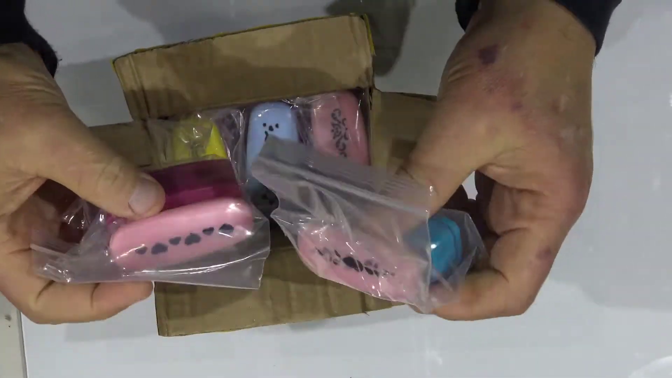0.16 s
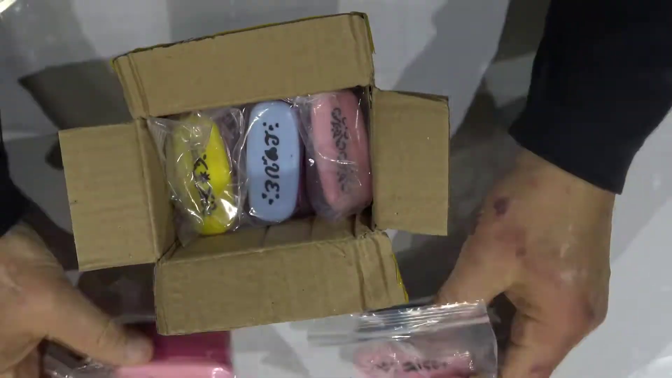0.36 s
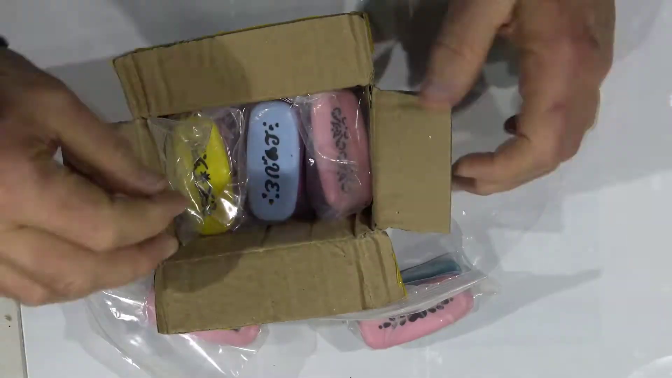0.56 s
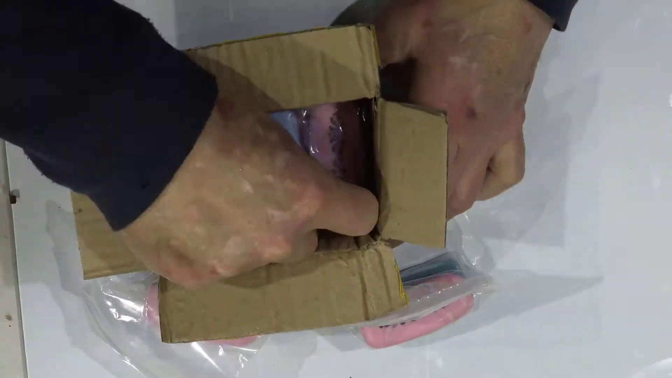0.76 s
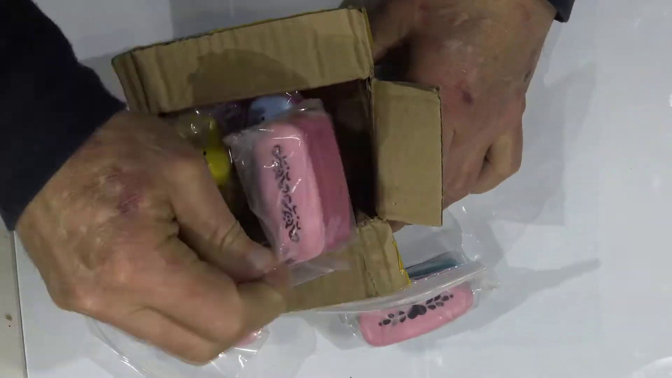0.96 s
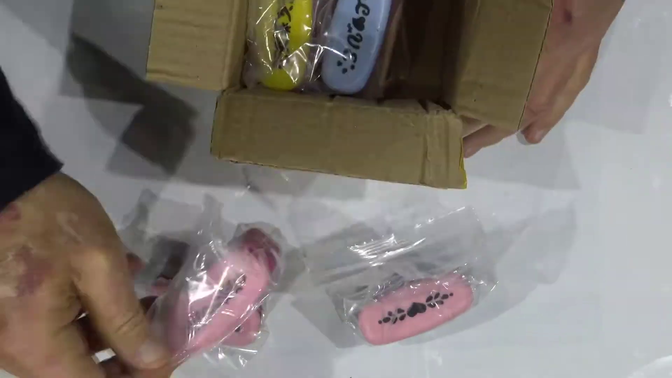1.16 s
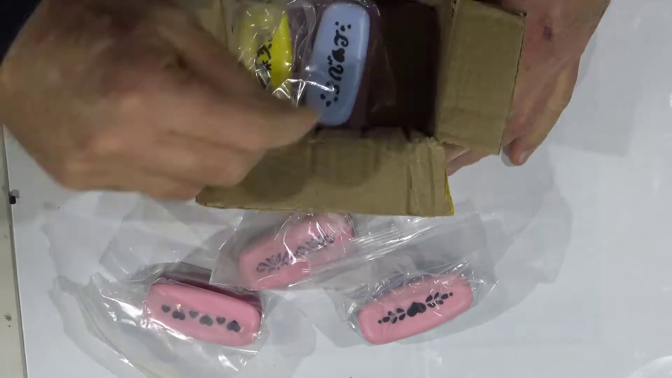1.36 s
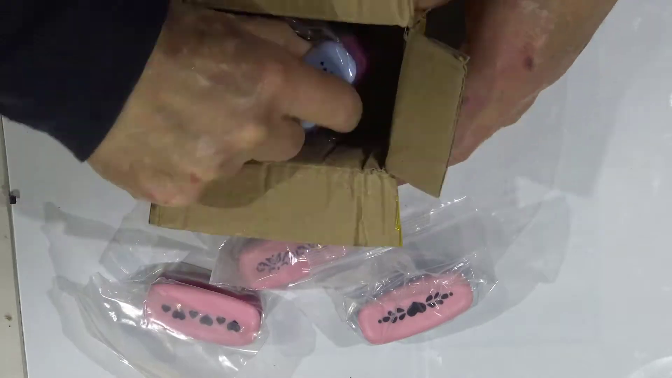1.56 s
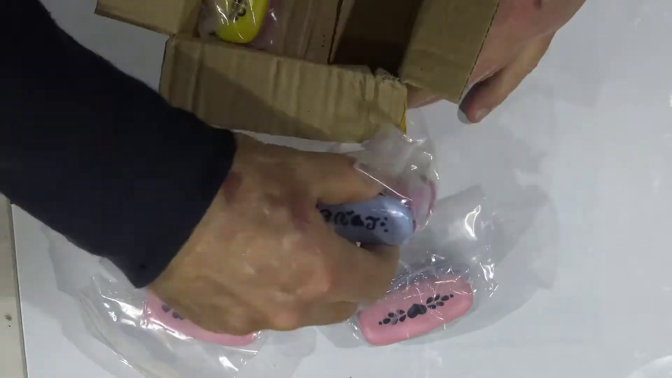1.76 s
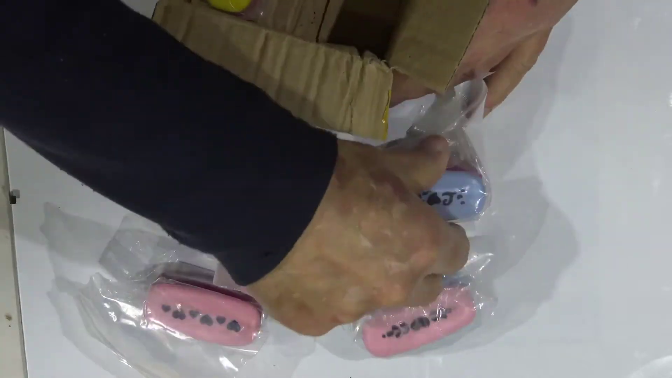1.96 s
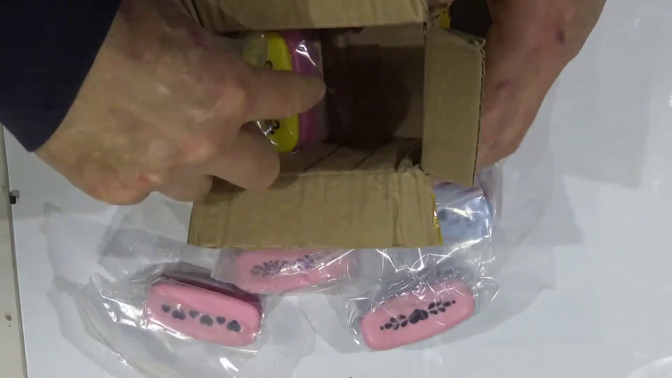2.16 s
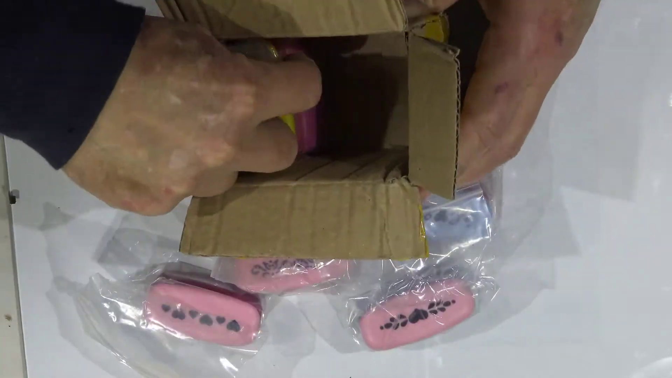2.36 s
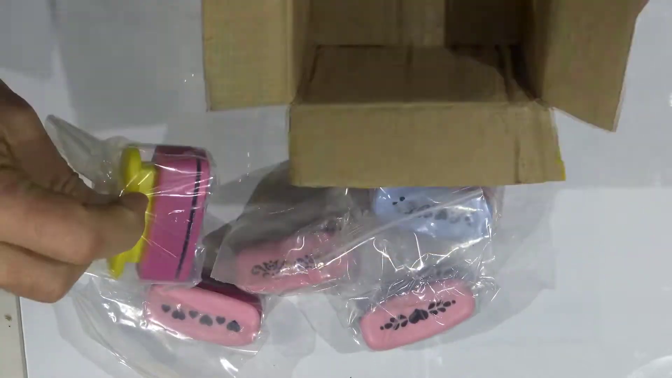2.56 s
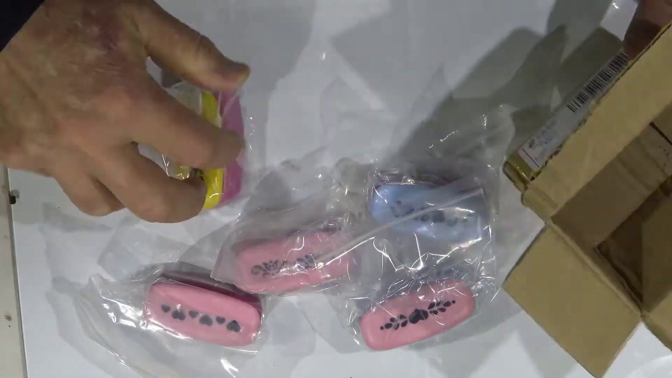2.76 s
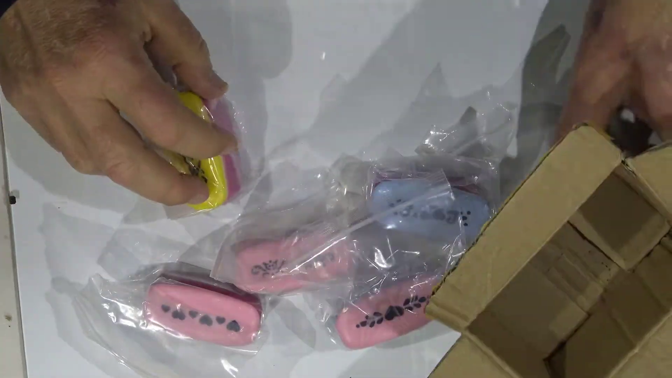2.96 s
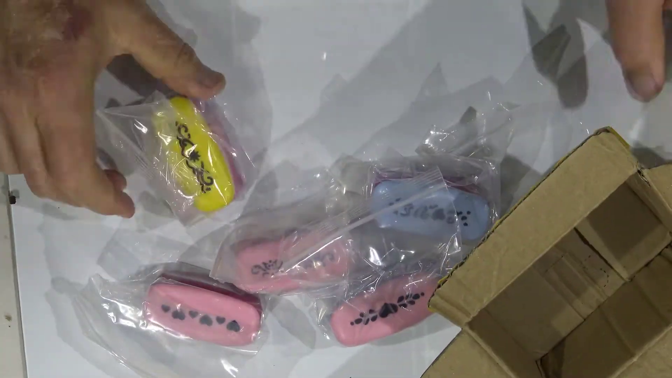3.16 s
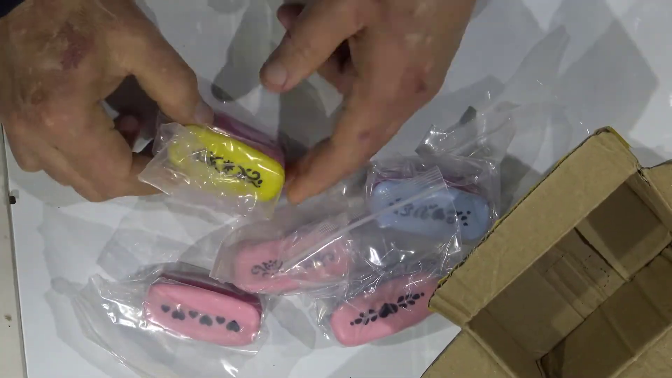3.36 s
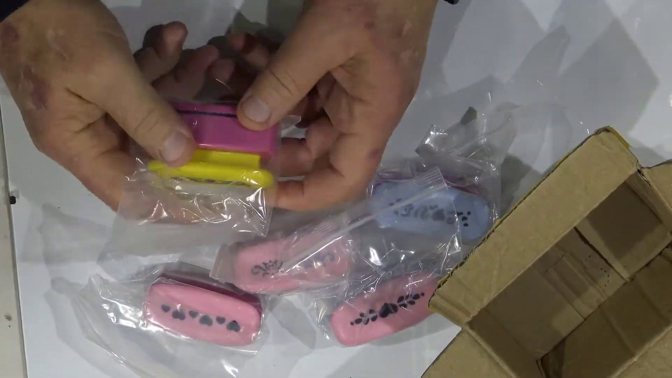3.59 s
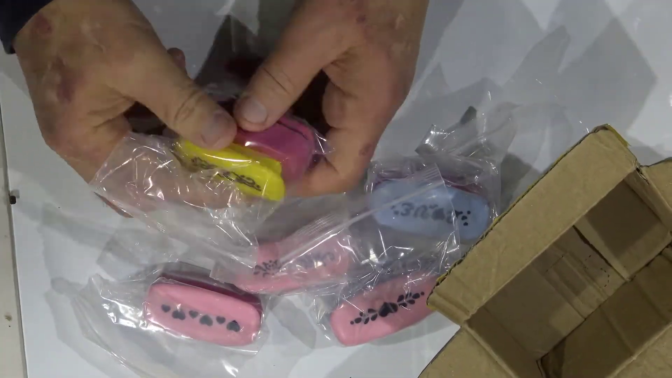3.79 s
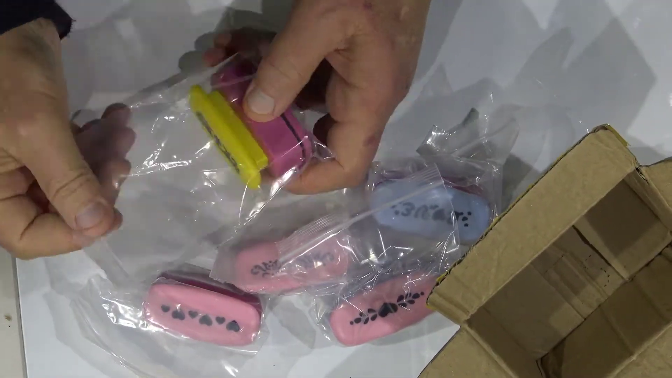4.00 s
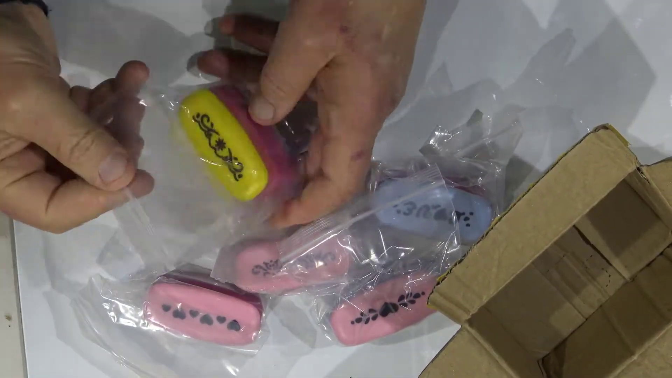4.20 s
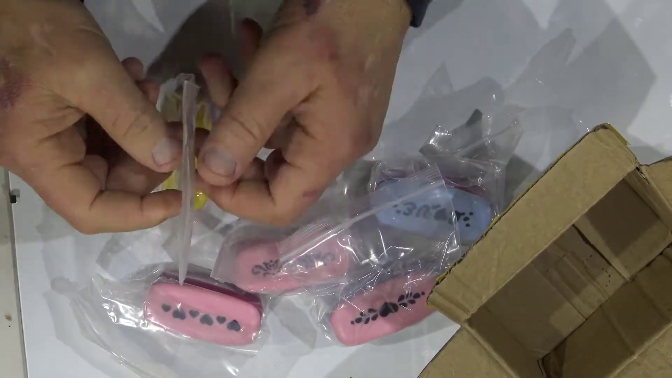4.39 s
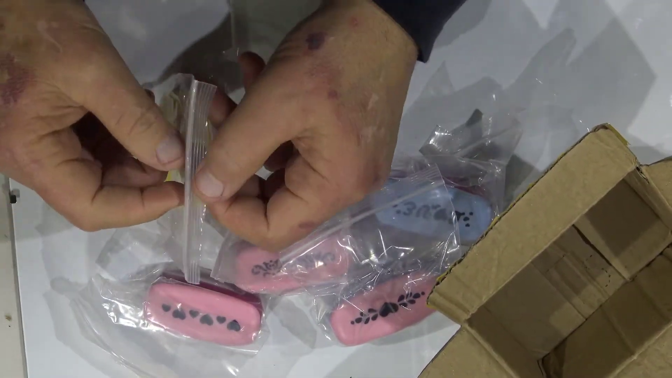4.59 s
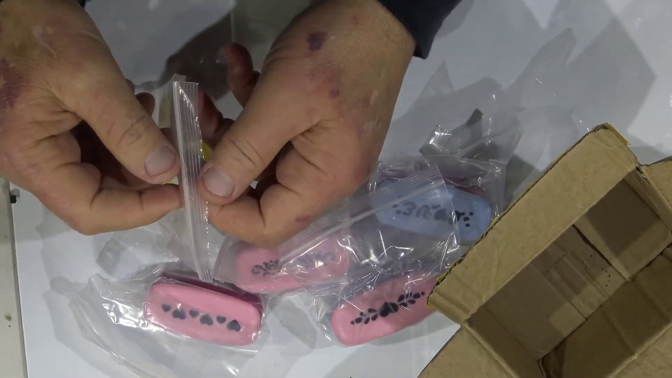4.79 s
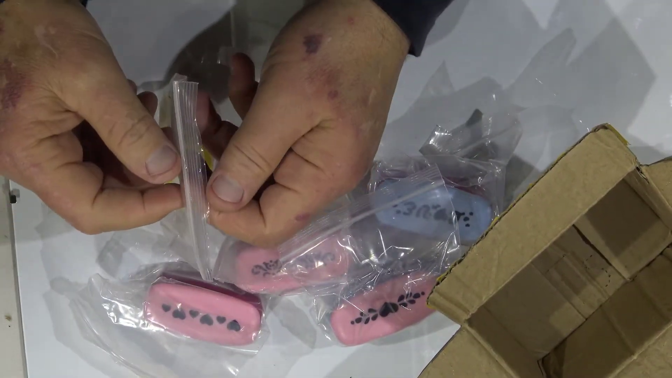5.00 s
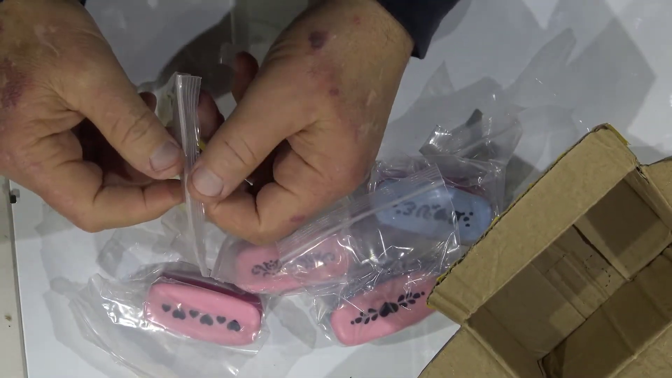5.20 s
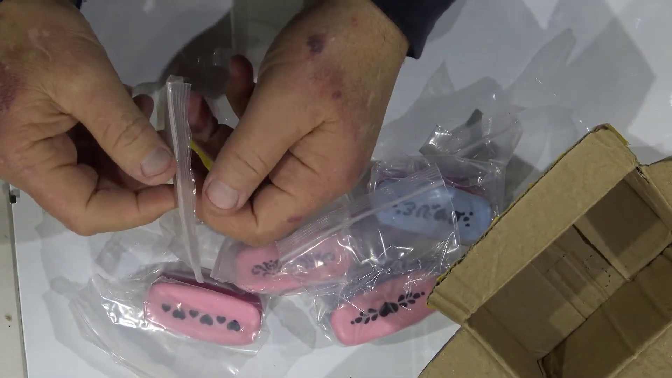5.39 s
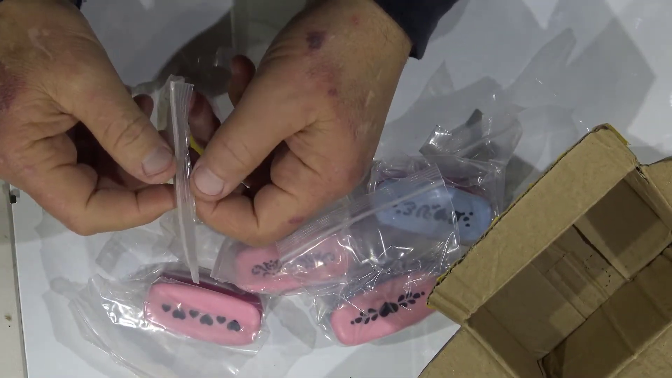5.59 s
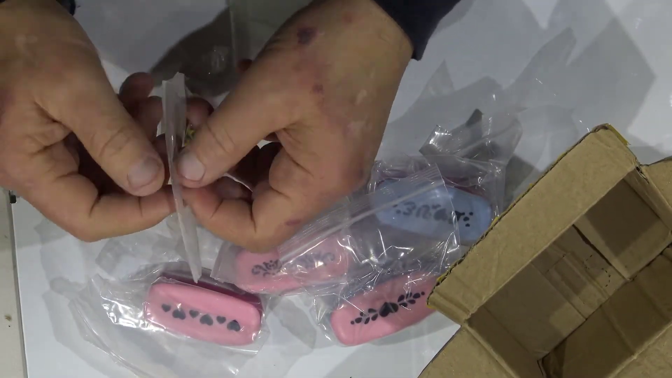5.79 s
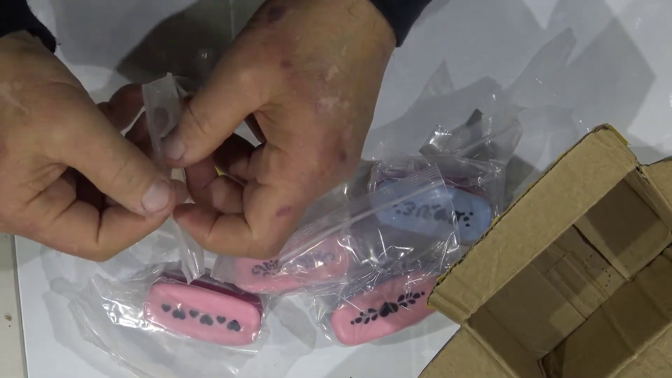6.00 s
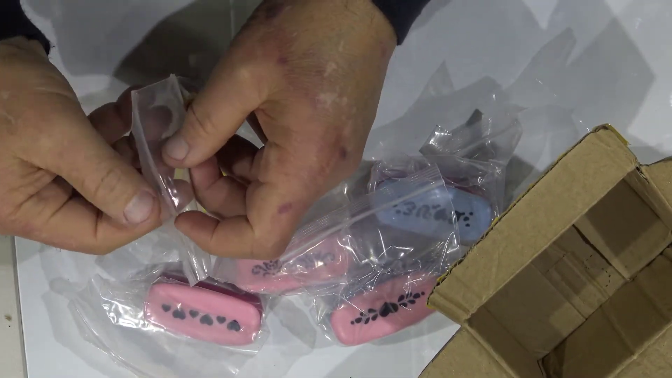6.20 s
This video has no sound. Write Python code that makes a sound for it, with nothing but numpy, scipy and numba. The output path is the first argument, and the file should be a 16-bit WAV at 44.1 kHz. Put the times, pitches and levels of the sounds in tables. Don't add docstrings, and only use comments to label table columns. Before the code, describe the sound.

Dense, dry plastic crackling fills the first three seconds, with hard case clacks, cardboard scuffs and a few dull table bumps. A bag is then handled in lighter, brighter crinkles, with one strong snap just before four seconds. After that it is nearly still: isolated film ticks over continuous hiss and thin machine whine, with two faint distant hoots. Close phone microphone in a small room, nearly centered, with very short reflections.

```python
import sys
import numpy as np
from scipy import signal
from scipy.fft import rfft, irfft
from scipy.io import wavfile
from scipy.ndimage import uniform_filter1d
from numba import njit

SR = 44100
rng = np.random.default_rng(int(sys.argv[2]) if len(sys.argv) > 2 else 0)


def to_linear_factor(level_db):
    exponent = np.asarray(level_db, float) / 20
    return 10 ** exponent


def int16_out(signal):
    q = np.round(np.clip(np.atleast_2d(signal).T, -1, 1) * 32767)
    wavfile.write(sys.argv[1], SR, q.astype(np.int16))


N = 275609
T = np.arange(N) / SR

# f/Hz, level/dB per Hz
AIR = [(18, -61), (30, -12), (306, 0.5), (519, 5), (760, 5.5), (900, 1.5), (1150, 4.5), (1600, -6),
       (1880, 7), (2150, 0), (2890, -0.5), (3480, 9), (4290, -3.5), (6380, 1), (8090, -12), (15800, -8),
       (16500, -39)]
AIR_DB = -46.5
HUM_HZ = [360, 448, 513.4, 528.9, 559, 888.2, 1797, 3520, 5780, 6417, 7090]
# level/dB rms, width/Hz
HUM = [(-75, 14), (-76, 14), (-73, 7), (-70, 7), (-76, 5), (-65, 1), (-72, 3), (-64, 250), (-69, 350),
       (-69, 120), (-67, 250)]
# t/s, length/s, f/Hz, level/dB
FAR = [
    (.02, .25, 950, -63),
    (5.14, .1, 795, -67),
    (5.13, .22, 950, -58.5),
    (5.8, .1, 792, -67),
    (5.8, .36, 950, -57.5),
]

# t/s, length/s, effort/dB, brightness/dB
LIFTS = [(0, 0.072, -46.5, -8), (0.194, 0.087, -47, -3), (0.344, 0.075, -50.5, 5.5),
         (0.423, 0.013, -32.5, 0), (0.584, 0.022, -42.5, -3), (0.71, 0.042, -33.5, -4),
         (0.79, 0.018, -48.5, 6), (0.824, 0.041, -39.5, 5), (0.911, 0.05, -32, -1),
         (1.288, 0.018, -39, 2.5), (1.452, 0.038, -37, -2), (1.513, 0.014, -44, -3),
         (1.553, 0.013, -34.5, 0), (1.579, 0.047, -26.5, 0.5), (1.735, 0.047, -40.5, -1),
         (1.798, 0.034, -38.5, 2), (1.849, 0.019, -34.5, -9), (1.929, 0.096, -39.5, -12),
         (2.208, 0.017, -40.5, 6), (2.263, 0.014, -38, -2), (2.308, 0.0085, -54, -2),
         (2.366, 0.017, -42, -1), (2.402, 0.068, -39.5, 0), (2.546, 0.13, -58.5, 8.5),
         (2.72, 0.012, -38, -2), (2.755, 0.053, -50.5, 4), (2.917, 0.018, -39.5, 1)]
# t/s, length/s, effort/dB, brightness/dB
TURNS = [(3.232, 0.031, -45.5, 3), (3.337, 0.091, -52.5, 7), (3.454, 0.036, -47, 13.5),
         (3.552, 0.0084, -42, 4), (3.586, 0.023, -45, 12.5), (3.645, 0.029, -39, -9), (3.69, 0.022, -44, 2),
         (3.781, 0.038, -60, 17), (3.837, 0.011, -43.5, 8.5), (3.878, 0.028, -28.5, 4),
         (3.992, 0.003, -35.5, 2), (4.004, 0.011, -31.5, 4), (4.079, 0.012, -45, -4),
         (4.117, 0.048, -44, -2), (4.229, 0.011, -52, 2), (4.287, 0.059, -47, 1),
         (4.706, 0.022, -49.5, 5.5), (5.092, 0.013, -48, 8), (5.458, 0.0059, -50.5, 10),
         (5.682, 0.011, -44.5, -1), (5.888, 0.022, -55, 7), (6.23, 0.0088, -52, 6)]
STILL_DB, IDLE_DB = -64, -3
# t/s, level/dB
FIDGET = [(0, -54), (.5, -58.5), (1.0, -62.5), (1.9, -56.5), (2.3, -46), (2.6, -61.5), (3.2, -60.5),
          (3.5, -58), (4.0, -56), (4.2, -55), (4.4, STILL_DB), (6.25, STILL_DB)]
ATTACK_DB_PER_S, RELEASE_DB_PER_S = 1217, 639
CARD_DB, CARD_SHARE = -45, 0.77
FIDGET_CARD_DB, FIDGET_CARD_SHARE, FIDGET_BRIGHT_DB = -54.5, 0.67, 3

# t/s, peak/dB, f/Hz,
# sheen/dB
CLEAR_SNAPS = [(0.0627, -20, 6840, -24), (0.0946, -18, 4720, -15), (0.2155, -11.5, 7200, -10),
               (0.24, -32, 6340, -5), (0.2517, -16, 8600, -10), (0.266, -15.5, 6530, -13.5),
               (0.3506, -20, 5400, -8), (0.3621, -10.5, 8830, -7.5), (0.384, -22.5, 7600, 1),
               (0.4817, -18, 5200, -9.5), (0.501, -18, 5400, -30), (0.5355, -29, 4450, -34),
               (0.6933, -15, 4400, -28), (0.7135, -13, 7500, -25), (0.741, -12, 7800, -18),
               (0.756, -21, 3800, -9), (0.8292, -7.5, 5940, -20), (0.8636, -7.5, 6240, -31),
               (0.8788, -16, 7500, -23), (0.91, -10, 6670, -16), (0.922, -14, 4360, -9),
               (0.968, -25, 9500, -7), (1.103, -22, 7200, -29), (1.1707, -44, 6940, -18),
               (1.2877, -18, 4650, -22), (1.384, -20.5, 7000, -15),
               (1.4428, -10, 4480, -12), (1.4607, -15, 6300, -5), (1.5252, -11, 4980, -13),
              (1.593, -3, 5300, -20), (1.723, -11.5, 9160, -6), (1.7663, -9.5, 8760, -25),
              (1.776, -12, 8100, -10), (1.8045, -6.5, 7270, -24), (1.8238, -12, 5040, -7),
              (1.9254, -24, 5370, -9), (1.9914, -13.5, 5430, -9), (2.0853, -18.5, 4640, -10.5),
              (2.205, -7, 7350, -13), (2.2178, -17, 5670, -5), (2.266, -23.5, 5300, 3),
              (2.307, -13, 4800, -6.5), (2.3693, -13, 9100, -10.5), (2.4144, -10, 4760, -8.5),
              (2.5476, -13, 4750, -10), (2.5792, -10.5, 6460, -14), (2.659, -21.5, 7340, 2),
              (2.7325, -16, 5300, -16), (2.7516, -16.5, 6920, -12), (2.832, -21, 7100, -5),
              (2.8806, -24.5, 6940, -17), (3.0137, -24, 4040, -16), (3.0477, -12.5, 9100, -14),
              (3.07, -23, 4920, -13), (3.1221, -18, 4680, -11),
               (3.232, -18.5, 4700, -5), (3.256, -12.5, 4970, -9), (3.2714, -18.5, 4780, -6),
              (3.3298, -13, 5800, -32), (3.4343, -18, 6800, -7), (3.4512, -18, 8300, -1),
              (3.465, -11.5, 6500, -4), (3.5197, -14.5, 7900, -3.5), (3.5505, -12, 7860, -20),
              (3.582, -12, 8200, -15), (3.607, -10, 8400, -11), (3.6278, -15, 6930, -5),
              (3.6914, -13.5, 6830, -5.5), (3.741, -28, 7350, -15), (3.781, -16, 6200, -8),
              (3.8093, -19.5, 6140, -8), (3.8469, -13, 6870, -14), (3.8923, -2, 6770, -20),
              (3.9571, -11, 8600, -28), (3.9746, -17, 4400, -4), (4.0769, -21, 4470, -25),
              (4.0997, -17.5, 7260, -18), (4.1215, -7.5, 8500, -21), (4.1545, -16, 8200, -12),
              (4.2177, -19.5, 6600, -12), (4.283, -25.5, 4250, -3.5), (4.313, -19, 5600, -21),
              (4.336, -28.5, 5070, -0.5),
               (4.4322, -23.5, 6100, -24), (4.6149, -20, 6160, -8.5), (4.7007, -24.5, 6000, -3),
              (4.725, -27, 5530, -13), (5.0982, -23, 6100, -10), (5.1066, -17, 6200, -5),
              (5.2034, -31, 5750, -9), (5.244, -21.5, 5300, -10), (5.3617, -26.5, 6400, -12),
              (5.461, -21.5, 6300, -6), (5.6819, -12.5, 7700, -11), (5.81, -20, 7100, -11),
              (5.8842, -24, 6430, -2.5), (6.0606, -24, 6400, -8), (6.0888, -31.5, 6450, -5),
              (6.128, -32, 5900, -19), (6.23, -20.5, 6420, -5.5)]
# t/s, peak/dB, f/Hz, sheen/dB
SMALL_SNAPS = [(0.028, -22.5, 6570, -7), (0.076, -27, 5900, -10), (0.223, -19, 4670, -10),
               (0.456, -28, 4010, -8), (0.714, -18, 4030, -19), (0.7882, -23, 5800, -15),
               (0.8231, -31, 3590, -18), (0.8386, -13.5, 4000, -19), (0.9044, -23, 7300, -13),
               (0.9684, -34, 5310, -12), (0.9946, -27, 5400, -9), (1.036, -30, 4220, -20),
               (1.094, -27, 3740, -12), (1.1715, -34, 6000, -12), (1.2933, -22, 5630, -23),
               (1.31, -34, 4140, -11), (1.4877, -17.5, 8500, -3), (1.495, -15, 8800, -2),
               (1.51, -20.5, 5730, -12), (1.5336, -14, 3360, -17), (1.551, -23, 3680, -15),
               (1.5653, -13, 9000, -10), (1.6679, -45, 5160, -24), (1.6974, -26, 5210, -15),
               (1.7581, -23, 8060, -11), (1.7707, -17, 7040, -5), (1.7849, -16.5, 4530, -3),
               (1.8073, -15, 5470, -12), (1.8525, -13.5, 5250, -11), (1.9297, -29, 3400, -6),
               (1.989, -27, 4830, -19), (2.0094, -32, 3500, -9), (2.1684, -29, 4050, -25),
               (2.2324, -32, 6370, -8), (2.246, -28, 6090, 2), (2.2872, -30, 3700, -21),
               (2.3265, -27, 7200, -10), (2.365, -25, 7750, -10), (2.378, -21, 3500, -6),
               (2.4499, -22, 4920, -6), (2.5364, -29, 5850, -20), (2.6434, -27, 6560, -18),
               (2.8057, -33, 4780, -16), (2.8234, -22, 6000, -9),
               (2.91, -13, 4900, -14), (2.9135, -10, 2530, -28), (2.92, -22, 3170, -26),
                    (2.938, -32, 3000, -6), (3.203, -31, 4250, -23), (3.2188, -26.5, 4500, -10),
                    (3.244, -22, 4060, -22), (3.308, -38, 3890, -26), (3.3607, -19, 4090, -19),
                    (3.456, -14, 7000, -19), (3.506, -24, 5860, -24), (3.5346, -21, 6270, -9),
                    (3.5563, -16, 4480, -18), (3.567, -26, 5030, -18), (3.587, -20.5, 4200, -17),
                    (3.6003, -15, 4750, -18), (3.6136, -18, 3900, -12), (3.6445, -25, 5200, -19),
                    (3.6508, -19, 3860, -11), (3.6627, -11.5, 7800, -10), (3.6866, -24, 6400, -6),
                    (3.8335, -18, 8100, -8), (3.859, -27, 5940, -15), (3.8694, -20, 6510, -15),
                    (3.917, -18, 4370, -15), (3.9225, -19, 5330, -6), (3.952, -36, 5380, -22),
                    (3.996, -29, 4610, -20), (4.004, -19, 4420, -17), (4.0352, -29, 3650, -21),
                    (4.068, -28, 4100, -15), (4.0804, -24, 3680, -25), (4.117, -23, 7440, -5),
                    (4.143, -23, 4040, -13), (4.224, -20.5, 6150, -23), (4.2737, -29, 5800, -20),
                    (4.3243, -25.5, 5750, -16), (4.46, -26.5, 5700, -13), (4.691, -28, 3540, -7),
                    (5.0788, -29, 6200, -21), (5.096, -31, 5300, -11), (5.2627, -35, 4600, -24),
                    (5.6774, -20, 6200, -12), (5.9004, -23, 7040, -13)]
SNAP_LATE_S, SNAP_DB, SMALL_DB, SHEEN_DB = .0009, 1, 2, 5.5
STRAY_TOP_DB, STRAY_DB, STRAY_SCATTER_DB, STRAY_HZ, STRAY_SHEEN_DB = -23, 16.5, 11, 5300, -23
POPPED_DB, POPPED_HZ, POPPED_SHEEN_DB = -8, 3000, 3.5

# t/s, peak/dB, loudest ring f/Hz, thump below 400 Hz/dB, box share/0-1
KNOCKS = [(0.423, -11.5, 1950, 0.5, 0), (0.425, -13.5, 680, 1.5, 0), (0.462, -21, 860, -13, 0.46),
          (0.691, -31, 643, -27, 0.96), (0.713, -24.5, 1100, -7, 0.6), (1.29, -36, 670, -2, 0.3),
          (1.303, -33.5, 444, 9, 0.24), (1.442, -30.5, 1100, -37, 0), (1.525, -32.5, 2280, -43, 0.55),
          (1.743, -27.5, 1784, -8, 0.15), (1.805, -25.5, 655, -41, 0.2), (1.826, -25, 1420, -35, 0.15),
          (1.957, -11.5, 1146, -18, 0.35), (1.9635, -18.5, 804, -28, 0.3), (2.537, -34, 1330, -40, 0.1),
          (2.547, -25, 1460, -47, 0.15), (2.579, -30.5, 1730, -46, 1), (2.713, -11, 993, -28, 0.66),
          (2.714, -14.5, 1530, -15, 0.6), (2.775, -24.5, 905, -20, 0.67), (2.909, -19.5, 1000, -2, 0.74),
          (2.913, -17, 1160, -4, 0.8), (2.92, -23.5, 2280, -16, 0.2), (2.939, -24.5, 1114, -20, 0.5),
          (3.305, -29.5, 1030, -30, 1), (3.347, -17.5, 1150, -45, 0.53), (3.89, -29, 1300, -32, 0.6),
          (4.004, -26, 1540, -38, 0.8), (4.067, -34, 1740, -30, 0.4), (4.7, -39.5, 2340, -30, 0.04),
          (5.106, -37.5, 1510, -33, 0.4), (5.684, -39, 1120, -29, 0.1)]
# f/Hz, level/dB, t60/s
CASE = [(665, -2, .06), (980, -5, .05), (1280, -1, .05), (1420, -6, .05), (1750, -3, .045), (1960, 0, .05),
        (2290, -4, .05), (2520, -6, .05)]
# f/Hz, level/dB, t60/s
BOX = [(390, -14, .05), (830, -3, .045), (1000, -2, .05), (1240, -1, .05), (1570, 0, .045), (1800, -4, .04),
       (2310, -3, .045), (2630, -5, .04)]
RING_SHARE, RATTLE_DB, RATTLE_T60_S = 0.83, -14.5, 0.11
# t/s, level/dB
TICKS = [
    (0.586, -45.5),
    (0.6022, -29.5),
]
# f/Hz, level/dB, t60/s
LID = [(3480, 6, 0.0098), (3250, 13.5, 0.015), (6200, -3, 0.014), (6820, 14, 0.015), (7500, 10.5, 0.014),
       (8500, 7, 0.013), (11900, -6, 0.031)]
# t/s, level/dB, f/Hz, t60/s
THUDS = [
    (0.72, -52, 105, 0.075),
    (1.303, -62, 75, 0.07),
    (1.304, -43.5, 199, 0.043),
    (1.798, -55, 212, .08),
    (2.713, -45, 45, 0.085),
    (2.91, -38, 175, 0.057),
    (3.32, -53, 160, 0.077),
    (4.301, -48, 267, 0.067),
]

SQUEAK_S, SQUEAK_LENGTH_S, SQUEAK_HZ, SQUEAK_BEND, SQUEAK_DB = 1.581, 0.0124, 4800, 0.136, -23
MIC_HZ, MIC_WIDTH_HZ, MIC_DB = 3430, 550, -6
ROOM_T60_S, ROOM_DB, SIDE_DB = .075, -10.5, -22
LIMIT = .6


def level(x, db):
    return x * to_linear_factor(db) / np.sqrt(np.mean(x ** 2))


def band(x, lo_hz, hi_hz):
    sos = signal.butter(2, [lo_hz, min(hi_hz, .48 * SR)], "band", fs=SR, output="sos")
    return signal.sosfilt(sos, x)


def tint(x, points):
    hz, db = np.transpose(points)
    bin_hz = np.arange(1, N // 2 + 2) * SR / N
    return irfft(rfft(x) * to_linear_factor(np.interp(np.log(bin_hz), np.log(hz), db)), N)


def walk(rate_hz):
    k = int(SR / rate_hz)
    held = np.repeat(rng.standard_normal(N // k + 1), k)
    return 1.3 * uniform_filter1d(uniform_filter1d(held, k), k)[:N]


@njit
def rings(s, hz, t60, size, turn):
    out = np.zeros(N)
    for k in range(len(s)):
        p = np.exp(2j * np.pi * hz[k] / SR - np.log(1000) / (t60[k] * SR))
        z, start = size[k] * np.exp(2j * np.pi * turn[k]), int(s[k] * SR)
        for i in range(start, min(N, start + int(t60[k] * SR * .83))):
            out[i] += z.real
            z *= p
    return out


def partials(s, hz, t60, db, spread_s, turns):
    one = np.ones_like(hz)
    late, phase = rng.random((2,) + hz.shape)
    start = s + spread_s * late
    return rings(start.ravel(), hz.ravel(), (t60 * one).ravel(), (to_linear_factor(db) * one).ravel(),
                 (0.84 + turns * phase).ravel())


def tone(hz, width_hz):
    wander = 1.5 + 5 / width_hz + walk(width_hz) + 1j * walk(width_hz)
    return np.real(wander * np.exp(2j * np.pi * hz * T))


def background():
    hiss = level(tint(rng.standard_normal(N), AIR), AIR_DB - 7.5) * to_linear_factor(0.5 * walk(1.83))
    hum = sum(level(tone(hz, width_hz), db) for hz, (db, width_hz) in zip(HUM_HZ, HUM))
    far = 0
    for s, length_s, hz, db in FAR:
        swell = np.sin(np.pi * np.clip((T - s) / length_s, 0, 1)) ** .5
        far = far + level(band(tone(hz, 55), hz - 20, hz + 20), db) * swell
    return hiss + hum + far


def gripping(dbs):
    s, length = np.transpose(LIFTS + TURNS)[:2]
    out = np.full(N, 1e-9)
    for start, held, db in zip(s, length, dbs):
        near = slice(max(int(start * SR) - SR // 10, 0), int(start * SR) + SR // 2)
        slack_db = ATTACK_DB_PER_S * np.maximum(start - T[near], 0)
        slack_db += RELEASE_DB_PER_S * np.maximum(T[near] - start - held, 0)
        out[near] += to_linear_factor(db - slack_db)
    return out


def efforts():
    db, bright_db = np.transpose(LIFTS + TURNS)[2:]
    rest_db = np.interp(T, *np.transpose(FIDGET))
    card_rest = to_linear_factor(FIDGET_CARD_DB + FIDGET_CARD_SHARE * (rest_db + 54))
    card = np.maximum(gripping(CARD_DB + CARD_SHARE * (db + 40.0)), card_rest)
    film = np.maximum(gripping(db), to_linear_factor(rest_db))
    bright = np.maximum(gripping(db + bright_db), to_linear_factor(rest_db + FIDGET_BRIGHT_DB))
    return [card, film, bright]


def crackle(lo_hz, hi_hz, cycles, scatter_db, at, jolt):
    pitch, phase, strength = rng.random((len(at), 3)).T
    hz = lo_hz * (hi_hz / lo_hz) ** pitch
    size = jolt * to_linear_factor(scatter_db * (strength - .5))
    return level(band(rings(at, hz, cycles / hz, size, phase), lo_hz, hi_hz), 0)


def rustle():
    at = rng.random(6000) * N / SR
    jolt = to_linear_factor(np.minimum(4.2 * rng.exponential(size=len(at)), 6.5))
    grip_db = 2.8 * walk(70)
    # lo/Hz, hi/Hz, ring/cycles, slide/dB
    bands = [(717, 3000, 1.3, 3.5), (2560, 9200, 1.1, 1.5), (6670, 17400, 16, -6.5)]
    out = 0
    for (lo, hi, cycles, slide_db), strength in zip(bands, efforts()):
        slide = level(band(rng.standard_normal(N), lo, hi), slide_db)
        effort = uniform_filter1d(strength, int(0.0016 * SR))
        swell = to_linear_factor(grip_db + 2.6 * walk(30) - 5)
        out = out + effort * swell * (crackle(lo, hi, cycles, 10., at, jolt) + slide)
    return out


def creases():
    clear = np.array(CLEAR_SNAPS) + [SNAP_LATE_S, SNAP_DB, 0, SHEEN_DB]
    small = np.array(SMALL_SNAPS) + [SNAP_LATE_S, SMALL_DB, 0, SHEEN_DB]
    at = rng.random(150) * (N - 1) / SR
    odd = rng.standard_normal((150, 3)).T
    db, bright_db = np.transpose(LIFTS + TURNS)[2:]
    grip_db = 20 * np.log10(gripping(db + bright_db / 2)[(at * SR).astype(int)])
    hold_db = np.maximum(grip_db, np.interp(at, *np.transpose(FIDGET)) + IDLE_DB)
    stray_db = np.minimum(hold_db + STRAY_DB, STRAY_TOP_DB) - STRAY_SCATTER_DB * abs(odd[0])
    stray = np.transpose([at, stray_db, STRAY_HZ * 1.7 ** odd[1], STRAY_SHEEN_DB + 5 * odd[2]])
    popped = [(s, db + POPPED_DB, POPPED_HZ, POPPED_SHEEN_DB) for s, db, *_ in KNOCKS]
    return np.vstack([clear, small, stray, popped])


def snaps():
    s, db, hz, sheen_db = creases().T[:, :, None]
    place = (np.arange(6) + rng.random((len(s), 6))) / 6
    body_hz = hz * 2 ** (.95 * (place - .5))
    sheen_hz = 9500 + 7000 * place
    body = partials(s, body_hz, 12 / body_hz, db - 9.5, .0003, .5)
    sheen = partials(s, sheen_hz, .0018, db + sheen_db - 6.5, .00015, .6)
    patch = rng.random((len(s), 16))
    flutter = partials(s, hz * 2 ** (1.694 * (patch - .55)), 0.016, db - 28.0, .004, 1)
    shimmer = partials(s, 8500 + 8000 * patch, 0.018, db + sheen_db - 22.5, 0.0016, 0.95)
    seam = partials(s, 1750 * 1.575 ** patch[:, :3], 0.01, db - 25.5, 0.0009, 0.87)
    return band(body + sheen + seam + flutter + shimmer, 930, 19000)


def knocks():
    out, n_s = np.zeros(N), np.arange(int(.2 * SR)) / SR
    touches = [(.0012, 0), (.0045, -6), (.013, -13)]  # delay/s, level/dB
    for s, db, hz, thump_db, box in KNOCKS:
        box = np.clip(box, .02, .98)
        case_modes = [(f, g + 20 * np.log10(1 - box), d) for f, g, d in CASE]
        box_modes = [(f, g + 20 * np.log10(box), d) for f, g, d in BOX]
        modes = np.array(case_modes + box_modes + [(hz, 1, .036), (350, thump_db + 0.5, .05)])
        mode_hz, mode_db, mode_t60 = modes.T
        for chance, (late_s, soft_db) in zip(rng.random((3, len(modes), 2)), touches):
            touch_hz = mode_hz * (1 + 0.03 * (chance[:, 0] - .5))
            touch_db = db - 8 + soft_db + mode_db + 7 * (chance[:, 1] - .5)
            out += partials(s + late_s, touch_hz, RING_SHARE * mode_t60, touch_db,
                            .0003 + late_s / 4, .15 + 40 * late_s)
        rattle = level(band(rng.standard_normal(len(n_s)), 540, 2730), db + RATTLE_DB)
        rattle = rattle * to_linear_factor(-60 * n_s / RATTLE_T60_S)
        i = int((s + 0.000803) * SR)
        out[i:i + len(n_s)] += rattle[:N - i]
    hz, db, t60 = np.transpose(LID)
    out += sum(partials(s, hz, t60, db + blow_db, 0.0005, 0.27) for s, blow_db in TICKS)
    s, db, hz, t60 = np.transpose(THUDS)
    thuds = partials(s, hz, t60, db, 0.0011, 0.087)
    return band(out, 255, 29000) + band(thuds, 30, 340)


def squeak():
    arch = np.sin(np.pi * np.clip((T - SQUEAK_S) / SQUEAK_LENGTH_S, 0, 1))
    phase = 2 * np.pi * np.cumsum(SQUEAK_HZ * (1 + SQUEAK_BEND * arch)) / SR
    return to_linear_factor(SQUEAK_DB) * arch ** .5 * np.sin(phase)


def room(x, t60_s):
    n_s = np.arange(int(.15 * SR)) / SR
    tail = rng.standard_normal(len(n_s)) * to_linear_factor(-60 * n_s / t60_s) * (n_s > .0015)
    return signal.fftconvolve(x, tail / np.linalg.norm(tail))[:N]


def scene():
    hands = rustle() + snaps() + knocks() + squeak()
    hands = hands + to_linear_factor(MIC_DB) * band(hands, MIC_HZ - MIC_WIDTH_HZ / 2, MIC_HZ + MIC_WIDTH_HZ / 2)
    air = background()
    side = room(hands, 0.015) + level(tint(rng.standard_normal(N), AIR), AIR_DB + 1.0)
    side = to_linear_factor(SIDE_DB) * (0.56 * band(side, 110, 1600) + to_linear_factor(-3.0) * side)
    mid = hands + to_linear_factor(ROOM_DB) * band(room(hands, ROOM_T60_S), 560, 11400) + air
    side = side + 0.025 * band(mid, 60, 400) + 0.069 * band(mid, 1300, 6200)
    side = side + 0.28 * band(air, 5400, 8000) + 0.069 * air
    return np.array([mid + side, mid - side])


def top_cut(x):
    return signal.sosfilt(signal.butter(12, 16970, fs=SR, output="sos"), x)


def record(dry):
    mix = LIMIT * np.tanh(dry / LIMIT)
    mix = signal.sosfilt(signal.ellip(8, .3, 60, 15800, fs=SR, output="sos"), mix)
    return top_cut(mix)


dry = scene()
out = record(dry)
int16_out(out)
```